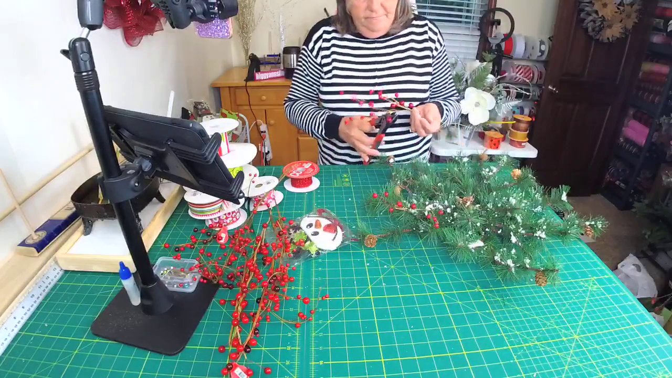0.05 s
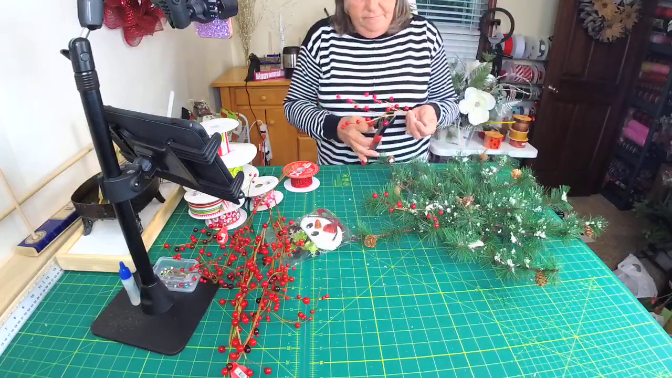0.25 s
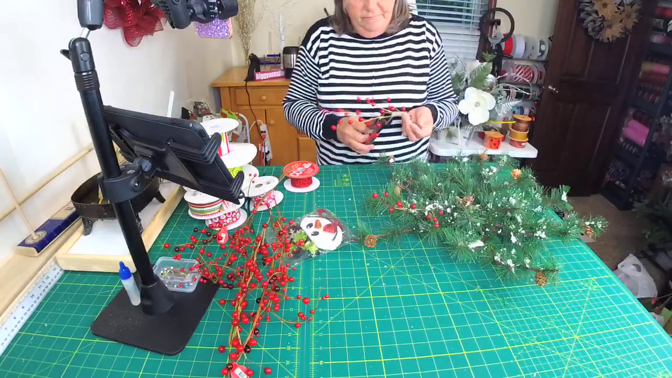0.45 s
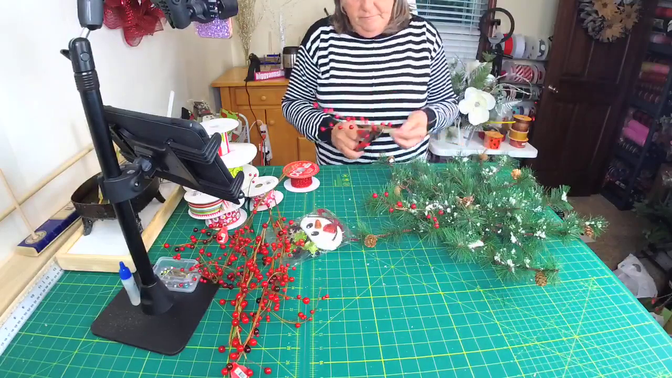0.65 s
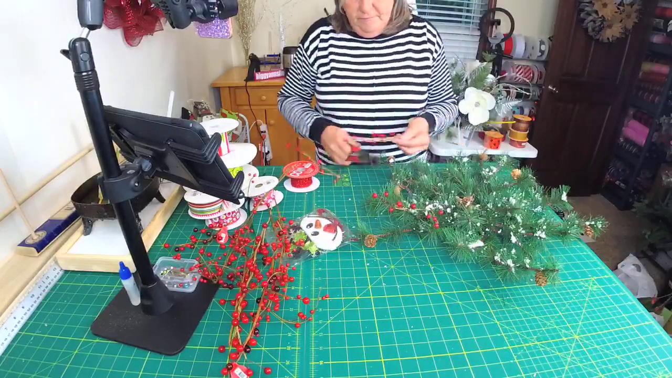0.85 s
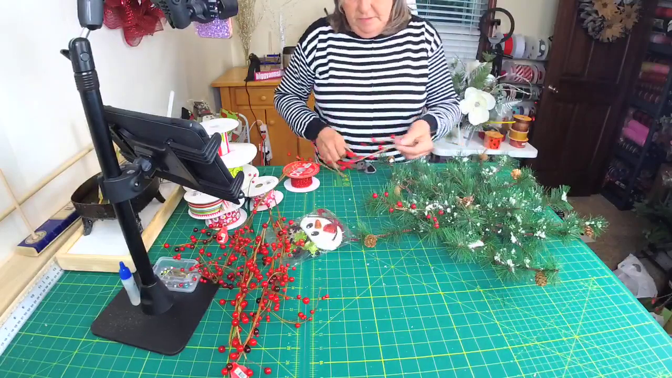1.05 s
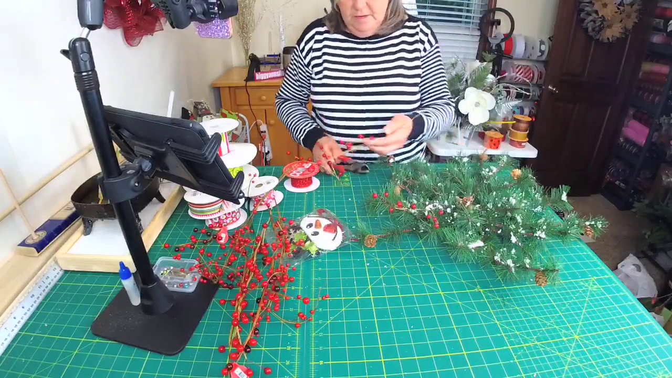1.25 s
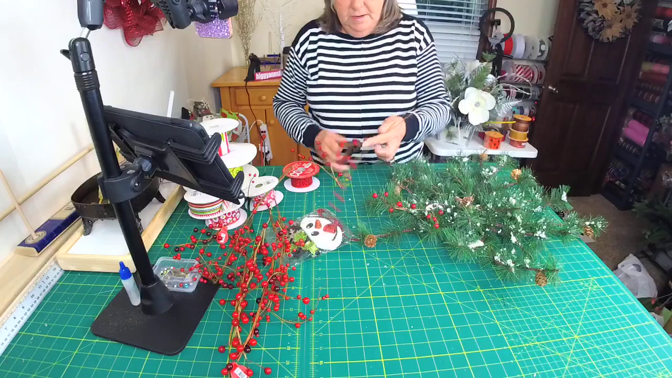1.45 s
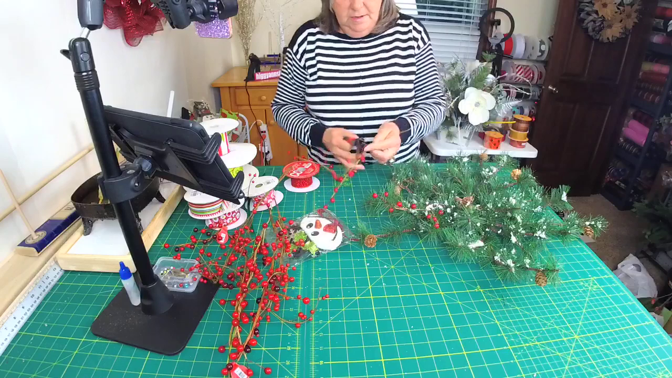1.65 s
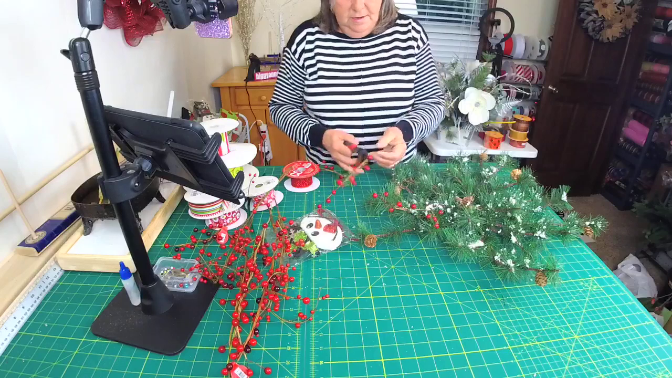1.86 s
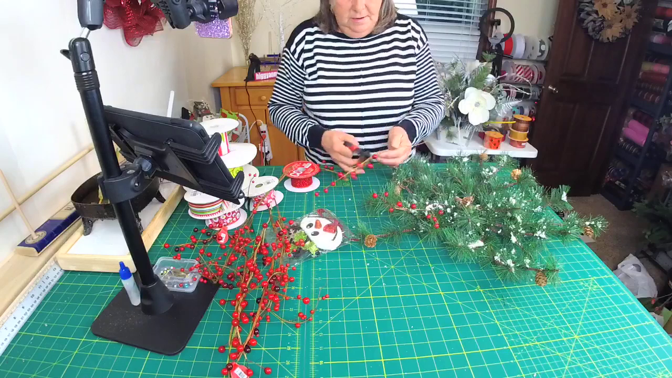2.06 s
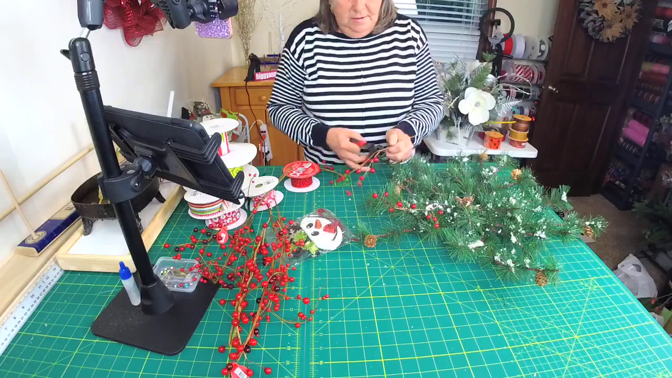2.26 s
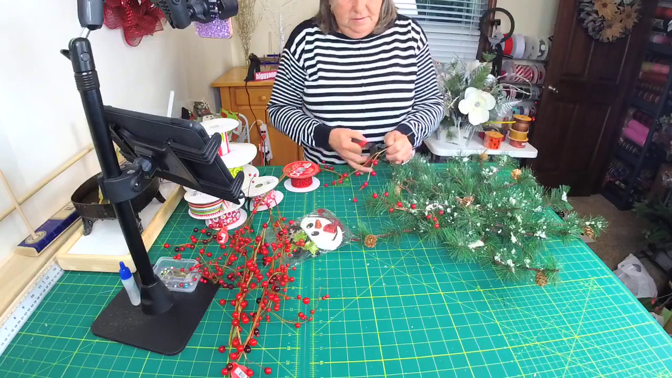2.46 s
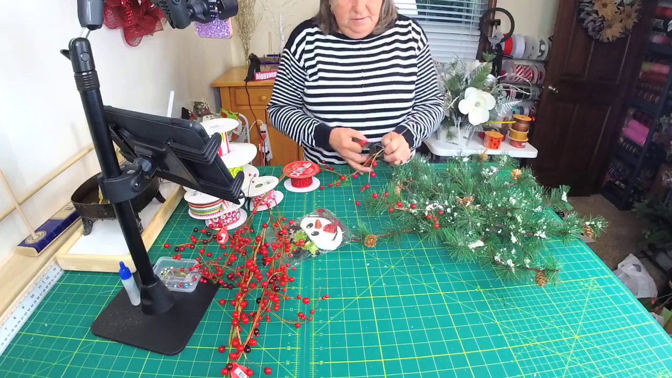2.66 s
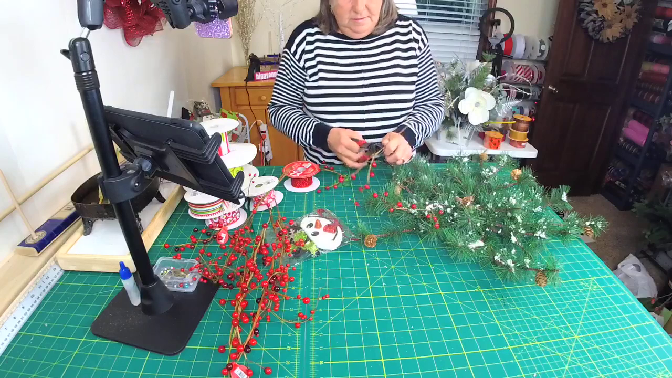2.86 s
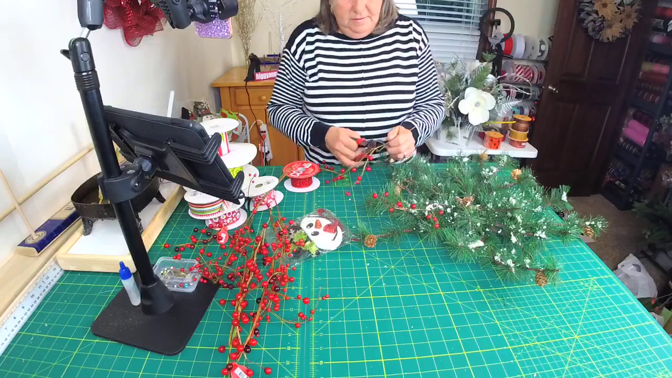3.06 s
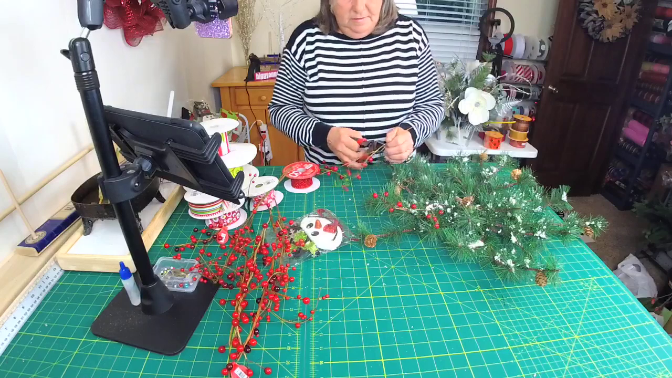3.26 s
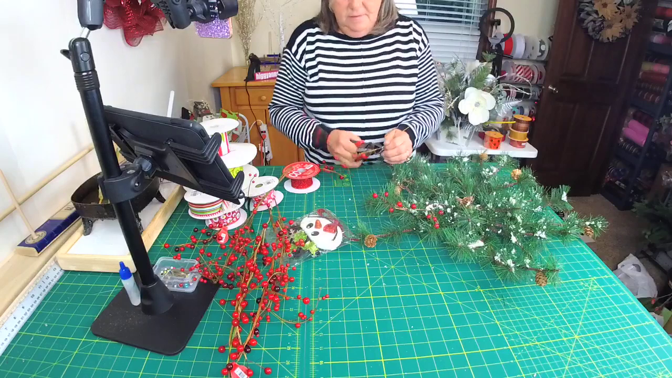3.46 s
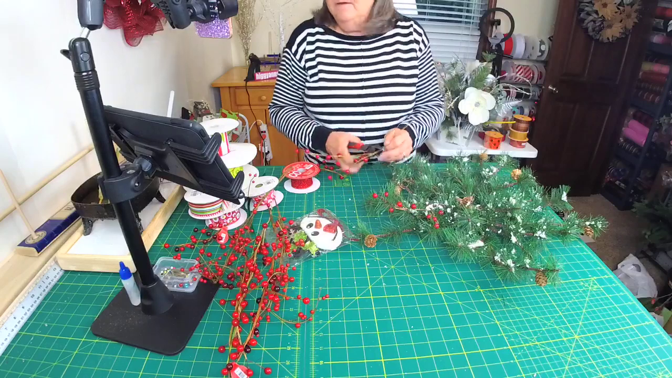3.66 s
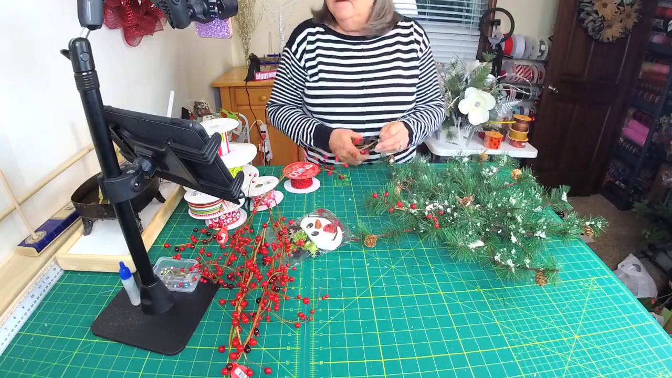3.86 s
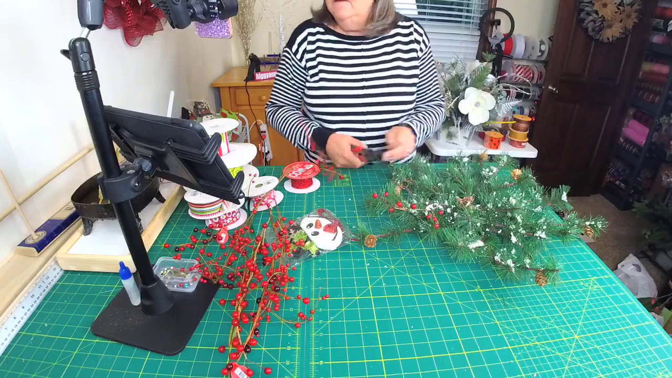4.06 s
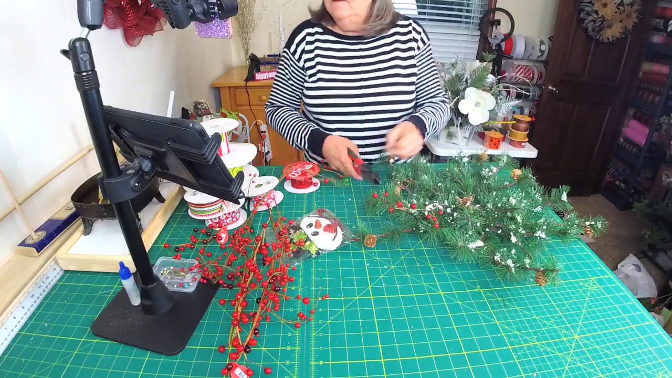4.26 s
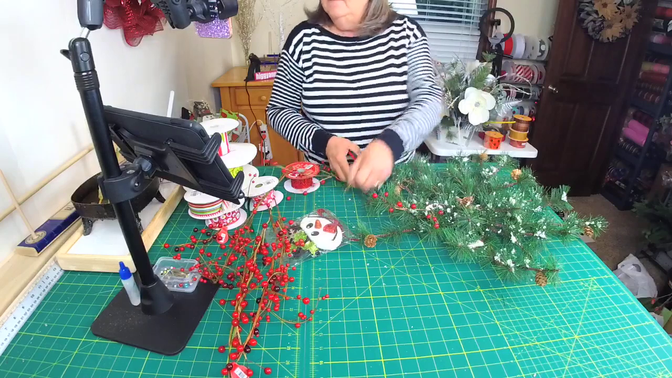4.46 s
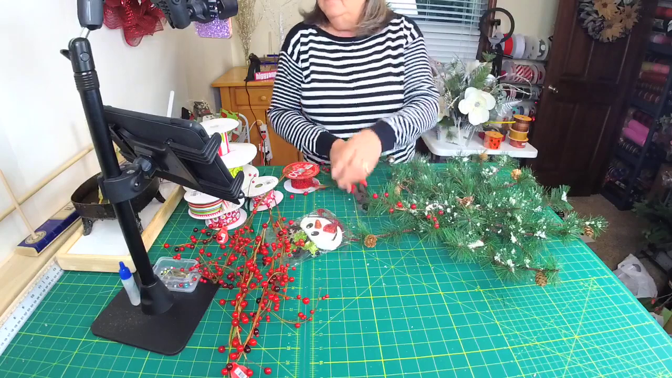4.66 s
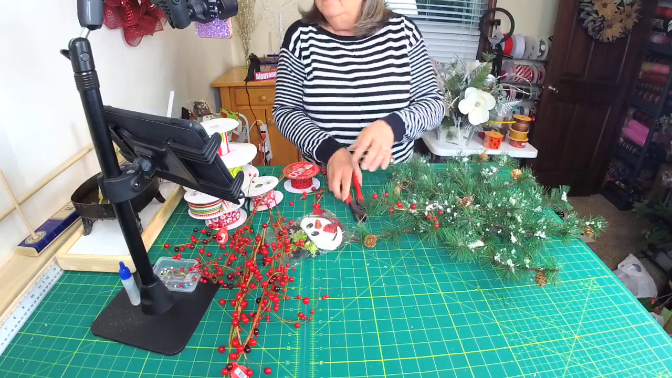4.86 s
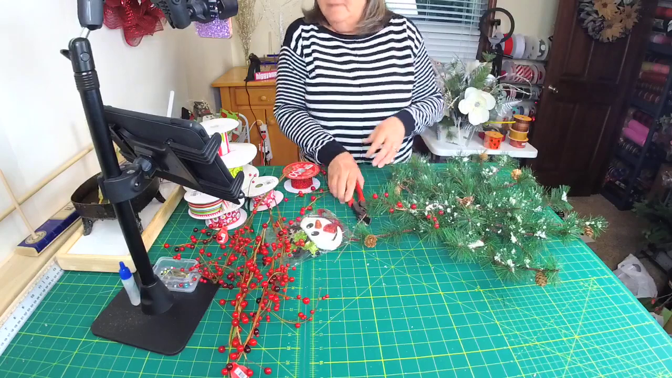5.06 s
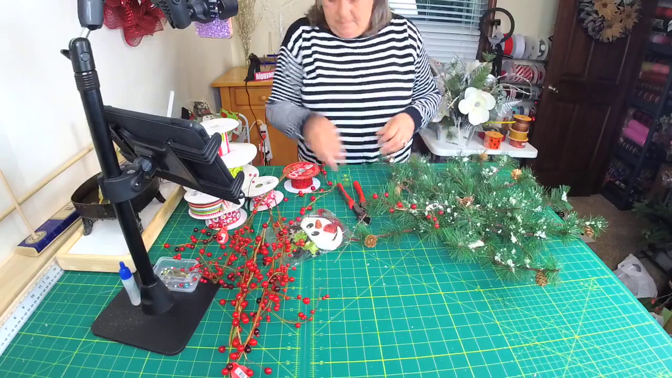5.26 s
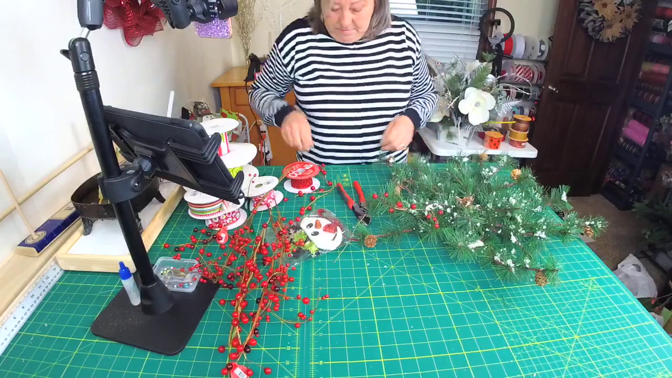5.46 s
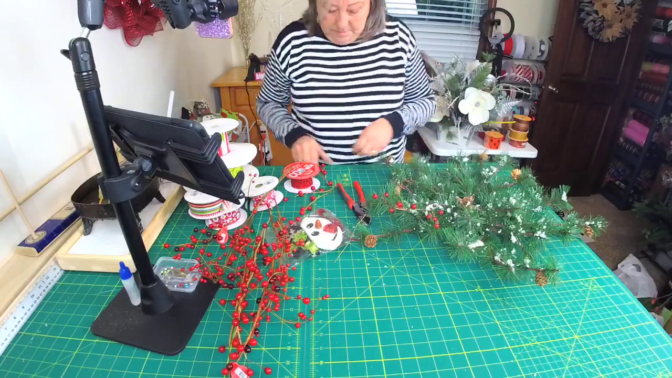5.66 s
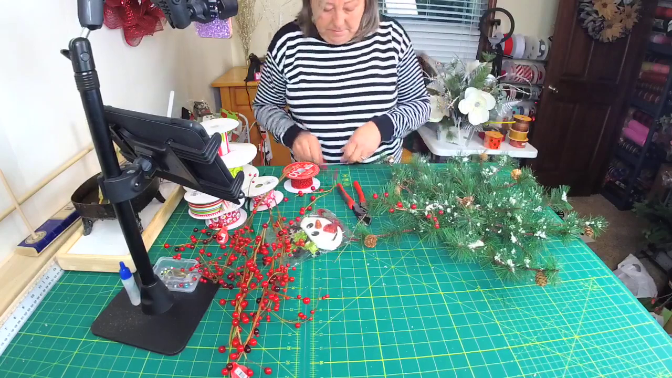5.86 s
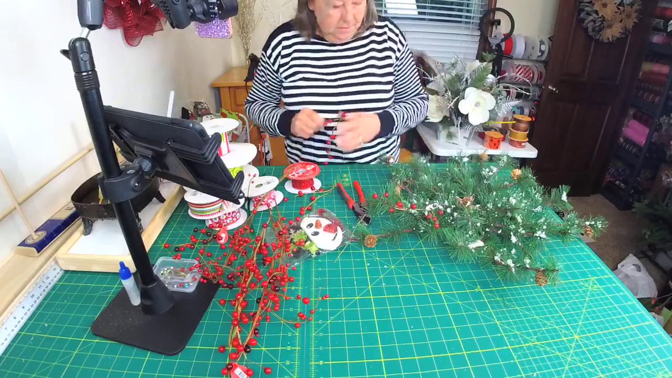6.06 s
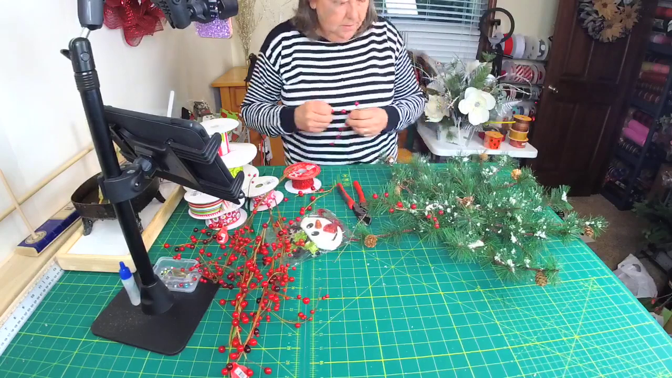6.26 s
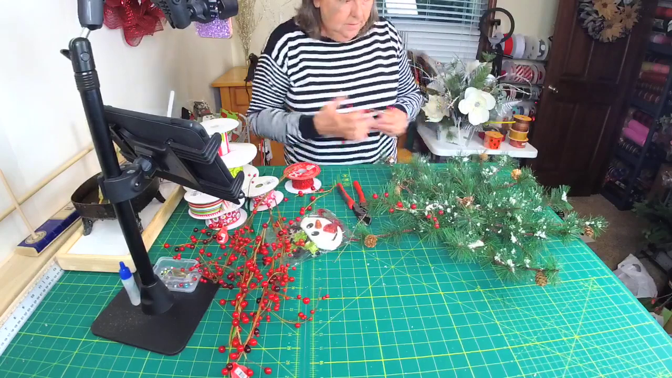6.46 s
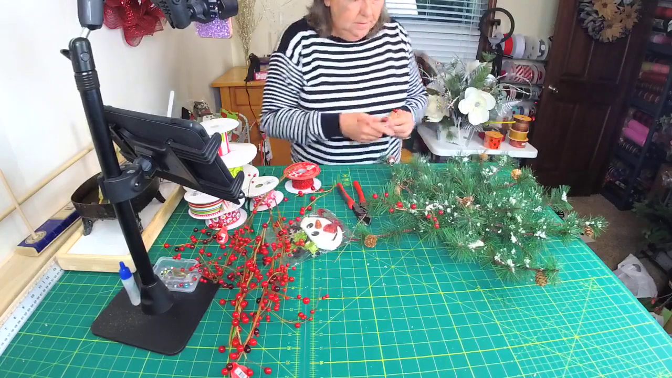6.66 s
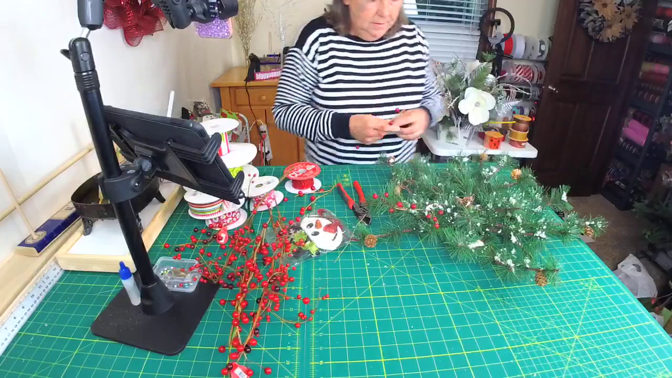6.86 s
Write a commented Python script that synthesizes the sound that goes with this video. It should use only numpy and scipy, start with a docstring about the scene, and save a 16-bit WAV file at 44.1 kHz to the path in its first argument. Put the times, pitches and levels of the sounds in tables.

```python
"""Wire cutters snip plastic berry stems above a craft table in a small furnished room: short bursts of noise
excite resonances. Stems and berries click the same way, and rustle as trains of tiny grains of noise.
Tools knock the table top (a push, a rebound and ringing modes) and wrists bump it (low fading tones).
Air handling rumbles, with mains hum and a thin flickering hiss (shaped noise and sines). A small microphone
pair hears it all through its housing, turns down during and just after loud sound, and clips."""
import sys
import numpy as np
from scipy import signal
from scipy.fft import rfft, irfft, next_fast_len
from scipy.io import wavfile
from scipy.ndimage import uniform_filter1d, map_coordinates

SR = 44100
rng = np.random.default_rng(int(sys.argv[2]) if len(sys.argv) > 2 else 0)


def inscribe(sig):
    """Save sig as 16-bit PCM at rate SR to the path in sys.argv[1].

    A 1-D sig is mono; a 2-D sig holds one channel per row.
    Samples are clipped to [-1, 1] before scaling.
    """
    pcm = np.round(np.clip(np.atleast_2d(sig).T, -1, 1) * 32767)
    wavfile.write(sys.argv[1], SR, pcm.astype(np.int16))


N = 305172  # length in samples

# room tone, rumble of the air handling: f/Hz, relative level per Hz/dB
RUMBLE_SPECTRUM = [(12, -42), (20, 2), (32, -17.5), (140, -12.5), (208, -21), (243, -20), (263, -17),
                   (360, -17.5), (447, -23), (484, -23), (625, -33.5), (873, -32.5), (2200, -46.5),
                   (2860, -107), (4840, -120)]
# room tone, thin hiss: f/Hz, relative level per Hz/dB
HISS_SPECTRUM = [(1500, -120), (2300, -12), (3500, -7.5), (5500, -13.5), (6300, 2.5), (8500, 1),
                 (11000, 2.5), (12800, -9), (13700, -4), (14100, -51), (16000, -64)]
# how alike left and right are in the noise: f/Hz, likeness (1 = same, 0 = unrelated)
LIKENESS = [(40, .93), (100, .98), (400, .97), (800, .86), (1600, .76), (3000, .3), (4200, .2), (6500, .45),
            (10000, .37), (15000, 0)]
# lean of the hiss to one side: f/Hz, left minus right/dB
HISS_LEAN = [(4000, 0.5), (6200, -2.5), (8700, 0), (10800, -5.5), (13000, 5.5)]
# mains hum: f/Hz, level/dB
HUM_TONES = [(59.8, -59), (240.3, -57), (479.8, -73.5)]

# how long the room rings: f/Hz, time to fall by 60 dB/s
ROOM_DECAY = [(500, 0.2), (1300, 0.15), (3500, 0.19), (9000, 0.15), (14000, 0.17)]
# first echoes from the walls: earliest t/s, level of the group/dB
FIRST_ECHO = (0.0063, 1.5)

# stems and berries tap each other and the mat: t/s, snap energy/dB,
# then relative to the snap: berry level/dB, stem level/dB, mat level/dB; berry f/Hz
TAPS = [(0.7554, -30.5, -8, -4.5, -40, 1670), (.8992, -17.5, 9, 2.5, -18, 1050),
        (0.9436, -13, 9.5, 5, -31, 1240), (.952, -31, 16.5, -5, -20, 1650),
        (1.062, -28.5, 13.5, 3.5, -15, 920), (1.125, -33, 0.5, 1, -22, 900),
        (1.5599, -7, -3, -4, -11.5, 880), (1.704, -17.5, -6.5, -5, -36, 930),
        (1.736, -34.5, 11.5, 11, -16, 920), (1.7713, -9, -7.5, -6.5, -27, 935),
        (1.778, -14.5, -4.5, -5, -28, 1100), (1.8854, -8.5, -8.5, -5, -12, 1180),
        (1.931, -27, -29, 0, -20, 1360), (2.1828, -8.5, -5.5, -5, -15, 980),
        (2.3358, -21, -4.5, -1, -34, 1050), (2.4572, -29.5, 0.5, 1, -22, 845),
        (2.607, -39, 2, 5.5, -15, 940), (2.8097, -34.5, 3, 5.5, -9, 915), (3.127, -37.5, 2, -1, -13, 980),
        (3.1981, -15, 5.5, 2.5, -38, 1150), (3.3075, -30, 7.5, 2.5, -17, 1240),
        (3.4716, -28, 0.5, -35, -18, 1230), (4.125, -17.5, 5, 1, -15, 1030),
        (4.1784, -30, -1, -9, -5, 1500), (4.192, -17, 6.5, 1, -35, 1130), (4.2108, -24.5, -3, 4.5, 2, 1120),
        (4.217, -37, 15, 0, -17, 1450), (4.2562, -32.5, 15.5, 12.5, -18, 1330),
        (4.2846, -34.5, 9, 5, -17, 1260), (4.3074, -36, 11, -8, -15, 1210),
        (4.434, -13.5, -1.5, -3, -29, 1370), (4.6268, -7, -5.5, -6, -21, 815),
        (4.6613, -11.5, -2.5, -3.5, -23, 875), (4.746, -22.5, 6, -3, -21, 900),
        (4.7613, -22.5, -3, -7, -1, 930), (4.9101, -41, 4, 13, -6, 1240),
        (4.799, -3.5, -4.5, -7, -6.5, 900), (5.0754, -21, -3.5, -5.5, -22, 930),
        (5.957, -20, 2, -2, -28, 1005), (5.9777, -18, 6, 0, -25, 1270), (5.994, -17, -9, -4, -37, 1320),
        (6.4526, -31, -6, -5, -22, 890), (6.4731, -26, -8.5, -12, -30, 860)]
# what a click sounds through, in the order snap, stem, wire: f/Hz, width of one pass/Hz
CLICK_BODIES = [(8810, 2470), (3410, 2250), (5460, 990)]
# the cutting mat under the hands: f/Hz, width of one pass/Hz
CUTTING_MAT = (480, 480)
TAP_MS, TAP_WIRE_DB = 1.7, -10.5  # time scale; wire against the snap when the berry is at 0 dB
WIRE_YIELDS = 0.4  # dB of wire lost for each dB of berry
TAP_PAN_DB, TAP_ROOM_DB = 5, -0.5  # lean to the left, scaled for each body; room level

# the cutter jaws part a wire: t/s, snap energy/dB, time scale/ms
JAW_SNIPS = [(0.7785, 9.5, 3.9), (3.9951, 14, 1.4)]
# colour of a snip, relative to the snap: berry level/dB, stem level/dB, wire level/dB, mat level/dB; berry f/Hz
SNIP_LEVELS = (-19.5, -13.5, -15, -28, 1446)
SNIP_PAN_DB, SNIP_ROOM_DB = 3, -2.5  # lean to the left, scaled for each body; room level

# stems dragged through fingers and needles: middle of the rise t/s, held t/s, level/dB, berry against it/dB
DRAGS = [(.95, .01, -54.5, 4), (1.14, 0.15, -64, -4), (1.57, .03, -64, 8), (1.741, 0.12, -61.5, 4.5),
         (3.199, 0.014, -49, -2), (3.29, 0.015, -68.5, 8), (3.47, 0.0072, -57.5, -17),
         (4.121, 0.038, -53.5, 4), (4.19, 0.09, -59, 9.5), (4.36, 0.13, -64.5, 2), (4.62, 0.031, -47.5, 0),
         (4.76, 0.21, -62, 1), (5.8, 0.1, -63, -5), (5.972, 0.0055, -48.5, 9), (6.04, 0.088, -71, -7),
         (6.24, 0.014, -57.5, -6.5), (6.44, 0.051, -73, -12)]
GRIP_S, FADE_DB_PER_S = 0.018, 236  # rise of a movement; its dying away
GRAINS_PER_S = 300  # average number of grains

# wrists and forearms leaning on the table: t/s, level/dB, base f/Hz, time to fall by 60 dB/s
WRIST_BUMPS = [(1.029, -43.5, 38.1, 0.91), (1.373, -32, 109.5, 0.086), (1.9, -30.5, 82.3, 0.14),
               (6.257, -32, 140, 0.11)]

# tools strike the table top: t/s, ring level/dB, contact rise/ms, direct push over the ring/dB,
# rebound delay/ms, rebound against the push/dB, crack over the ring before dulling/dB
TOOL_BLOWS = [(4.5231, -14.5, 0.5, 16.5, 1.72, 4.5, 10.5), (4.686, -26.5, 1.2, 2, 3.6, -5, 7),
              (4.9269, -15, 0.59, 7.5, 3.5, 2.5, 9), (5.196, -15.5, 0.985, -11, 2.52, 19, 7),
              (5.216, -15.5, 1.35, 6.5, 3.15, 7.5, 16.5)]
# ringing modes of the table top: f/Hz, middle level/dB, time to fall by 60 dB/s
TABLE_MODES = [(57.6, -13, 0.74), (99, -24, 0.35), (148.5, 1.5, 0.2), (180, -1, 0.11), (252.8, -5, 0.2),
               (298, -4, 0.14), (337.3, -3.5, 0.29), (407, 7, 0.19), (447, 0, 0.2), (602, 1.5, 0.18),
               (651, -1, 0.22), (796, -2, 0.25), (876, -2.5, 0.31), (920, -3, 0.06), (1030, -17, .12),
               (1020, -14, 0.2), (1290, -34, .12), (1550, -37.5, 0.16)]
# colour of a crack before dulling, relative to the snap:
# berry level/dB, stem level/dB, wire level/dB, mat level/dB; berry f/Hz
CRACK_LEVELS = (-2.5, -8.5, -13, 6.5, 958)
CRACK_MS, CRACK_DULLS = 1.3, 6.2  # time scale; dB of dulling per doubling of (1 + 2 * contact rise in ms)

# gaps in the response of the microphone housing: f/Hz, width/Hz, gain at the middle/dB
HOUSING_GAPS = [(2398, 580, -40), (4730, 1030, -23), (7140, 1760, -25.5), (11910, 1300, -41),
                (13860, 2300, -23), (16600, 5200, -23)]
# constant offset of the signal, one row each for left and right: offset (1 = full scale)
STEADY_OFFSET = [
    [.0153],
    [.0077],
]
TOP_HZ = 15700  # upper end of the band
DUCK_S, DUCK_LEVEL = 0.015, 1.42  # averaging time of loudness; loudness that halves the gain


def amp(db):
    """Turns decibels into gain."""
    return 10 ** (np.asarray(db) / 20)


def unit(x):
    """Scales x to an average (rms) level of 1."""
    return x / np.sqrt(np.mean(x ** 2) + 1e-20)


def along(points, hz):
    """Reads a curve of (Hz, value) points, spaced by pitch rather than by Hz."""
    f, v = np.transpose(points)
    return np.interp(np.log(hz + 1), np.log(f + 1), v)


def filtered(x, response):
    """Multiplies the spectrum of x by a response that depends on frequency."""
    m = next_fast_len(x.shape[-1] + 8192)  # spare room lets the filter ring out
    hz = np.fft.rfftfreq(m, 1 / SR)
    return irfft(rfft(x, m) * response(hz), m)[..., :x.shape[-1]]


def resonance(f, hz, width_hz):
    """Response of a body that rings at one pitch, with a gain of 1 there."""
    return 1j * f * width_hz / (hz * hz - f * f + 1j * f * width_hz)


def add(track, s, sound):
    """Mixes a sound into the track at time s."""
    part = track[..., round(s * SR):round(s * SR) + sound.shape[-1]]
    part += sound[..., :part.shape[-1]]


def room(x, wall_db=FIRST_ECHO[1]):
    """First echoes and a new random tail; how fast it dies depends on pitch, and its bass is alike on both sides."""
    hz, t, z = signal.stft(rng.standard_normal((2, SR // 3)), SR, nperseg=128)
    turn = np.arctan(hz / 4000)[:, None] * 0.64
    shared, own = np.cos(turn) * z[0], np.sin(turn) * z[1]
    z = np.array([shared + own, shared - own])
    fade = amp(-60 * t / along(ROOM_DECAY, hz)[:, None])
    tail = signal.istft(z * fade, SR, nperseg=128)[1]
    rise = 1 - np.exp(-np.arange(tail.shape[1]) / SR / 0.00017)
    tail = tail * rise / np.linalg.norm(tail[0])
    # four echoes, each reaching the two sides at slightly different times
    delays = FIRST_ECHO[0] * SR + 110 * rng.random(4) + 3 * rng.random((2, 4))
    echo = np.zeros_like(tail)
    echo[[[0], [1]], delays.astype(int)] = amp(wall_db) / 4
    return signal.fftconvolve(x, tail + echo, axes=1)


def coloured(burst, levels_db, bodies):
    """Sends a burst through each body twice, gives each result its own energy, and adds them."""
    bands = filtered(burst, lambda f: np.array([resonance(f, c, w) ** 2 for c, w in bodies])[:, None])
    bands = bands / np.linalg.norm(bands, axis=-1, keepdims=True)
    return np.sum(amp(levels_db) * bands, axis=0)


def rush(spectrum, patchy_db):
    """Stereo noise of average level 1, with random louder and softer patches in time and pitch."""
    z = signal.stft(rng.standard_normal((2, N)), nperseg=512)[2]
    field = uniform_filter1d(rng.standard_normal(z.shape[1:]), size=20, axis=0)
    field = uniform_filter1d(field, size=5, axis=1)
    pair = signal.istft(z * amp(patchy_db * unit(field)), nperseg=512)[1][:, :N]

    def shape(hz):
        turn = np.arccos(np.clip(along(LIKENESS, hz), -1, 1)) / 2
        return amp(along(spectrum, hz)) * [np.cos(turn), np.sin(turn)]

    mid, side = filtered(pair, shape)
    return unit(np.array([mid + side, mid - side]))


def room_tone():
    """Low rumble of air handling, mains hum of wavering phase and a thin hiss that flickers quickly."""
    t = np.arange(N) / SR
    hum = sum(amp(db) * np.sin(2 * np.pi * hz * t + np.cumsum(rng.normal(0, .012, N)))
              for hz, db in HUM_TONES)
    # a new random level every 220 samples (5 ms), joined smoothly
    flicker = map_coordinates(rng.standard_normal(N // 200 + 4), [np.arange(N) / 220])
    hiss = rush(HISS_SPECTRUM, patchy_db=.6)
    hiss = filtered(hiss, lambda hz: amp(along(HISS_LEAN, hz) * [[.5], [-.5]]))
    hiss = hiss * amp(2.85 * flicker)
    rumble = rush(RUMBLE_SPECTRUM, patchy_db=.3)
    return amp(-50) * rumble + amp(-60.5) * hiss + hum


def click(s, db, ms, colour, pan_db, room_db):
    """One sharp fracture amid smaller ones, over in milliseconds, ringing the bodies; mainly the snap leans."""
    berry_db, stem_db, wire_db, mat_db, berry_hz = colour
    u = np.arange(SR // 30) / SR * 1000 / ms
    shared, own = u * np.exp(-3 * u) * rng.standard_normal((2, len(u)))
    # the sharp fracture falls where the smaller ones are strongest
    shared[round(ms / 3000 * SR)] += 1.9 * np.linalg.norm(shared)
    burst = shared + .5 * own * [[1], [-1]]
    # snap, stem, wire, berry, mat
    levels_db = np.array([0, stem_db, wire_db, berry_db, mat_db])[:, None]
    levels_db = levels_db + np.outer([0.43, 0.096, 0.04, 0.071, 0.069], [pan_db, -pan_db])
    width_hz = np.interp(berry_db, [-4, 7], [1500, 300])  # a squarely struck berry rings, a grazed one only ticks
    bodies = CLICK_BODIES + [(berry_hz, width_hz), CUTTING_MAT]
    dry = amp(db) * coloured(burst, levels_db[..., None], bodies)
    sound = amp(room_db) * room(np.pad(dry, [(0, 0), (18, 0)]))  # the room starts 18 samples late
    # the hands hide part of the berries' knock, which arrives mostly by the walls
    add(sound, 0, filtered(dry, lambda f: 1 - .5 * resonance(f, berry_hz, 990)))
    return s - .0004, sound


def taps():
    """Stems and berries tap each other and the mat; the more berry, the less wire."""
    out = np.zeros((2, N))
    for s, db, berry_db, stem_db, mat_db, berry_hz in TAPS:
        wire_db = TAP_WIRE_DB - WIRE_YIELDS * berry_db
        colour = berry_db, stem_db, wire_db, mat_db, berry_hz
        add(out, *click(s, db, TAP_MS, colour, TAP_PAN_DB, TAP_ROOM_DB))
    return out


def snips():
    """The cutter jaws part a wire: a loud click, mostly snap."""
    out = np.zeros((2, N))
    for s, db, ms in JAW_SNIPS:
        add(out, *click(s, db, ms, SNIP_LEVELS, SNIP_PAN_DB, SNIP_ROOM_DB))
    return out


def rustle():
    """Dense uneven grains while stems slide: each movement rises, holds and dies away."""
    out = np.zeros((2, N))
    for s, held, db, berry_db in DRAGS:
        t = np.arange(0, held + .25, 1 / SR)
        sizes = rng.standard_normal(len(t)) * amp(2 * rng.exponential(size=len(t)))
        grains = sizes * (rng.random(len(t)) < GRAINS_PER_S / SR)
        rise = np.clip(t / GRIP_S, 0, 1)
        fade = amp(db - FADE_DB_PER_S * np.maximum(t - GRIP_S - held, 0))
        # snap, stem, wire, berry
        levels_db = [[[0]], [[berry_db / 2 - 7]], [[-12]], [[berry_db]]]
        slide = coloured(grains[None], levels_db, CLICK_BODIES + [(1250, 1570)])
        dry = rise * fade * np.sqrt(len(t)) * slide  # the root turns energy 1 into average level 1
        add(out, s - GRIP_S / 2, 0.57 * dry)
        add(out, s - GRIP_S / 2, room(dry))
    return out


def bumps():
    """Soft flesh gives a low, uneven thump of four fading tones, without a crack."""
    out, t = np.zeros(N), np.arange(SR // 2) / SR
    partials = [(1.057, 6), (0.697, 7.0), (1.55, 3.5), (2.4, -5.5)]  # f over base f, level/dB
    for s, db, hz, t60 in WRIST_BUMPS:
        thump = sum(amp(level) * np.sin(2 * np.pi * hz * ratio * t) for ratio, level in partials)
        rise = 1 - np.exp(-t / 0.014)
        add(out, s, amp(db - 60 * t / t60) * rise * thump)
    return out


def knocks():
    """A contact pushes the table top down, it springs back, rings unevenly and fills the room; longer is duller."""
    out, t = np.zeros((2, N)), np.arange(SR // 2) / SR
    for s, db, ms, push_db, rebound_ms, rebound_db, _ in TOOL_BLOWS:
        ring = np.zeros(len(t))
        for k, (hz, level, t60) in enumerate(TABLE_MODES):
            fade = amp(level + rng.normal(0, 2.2) - 60 * t / t60)
            wander = np.cumsum(rng.normal(0, 0.052, len(t)))
            ring += fade * np.sin(2 * np.pi * hz * t + k * np.pi + wander)
        ring *= 1 - np.exp(-t / 0.0013)
        u = t[:SR // 30] * 1000 / ms
        contact = u * u * np.exp(-2 * u)  # strongest at u = 1
        push = np.zeros(SR // 50)
        push[[0, round(rebound_ms * SR / 1000)]] = -1, amp(rebound_db)  # down, then back up
        direct = amp(db + push_db) * signal.fftconvolve(push, contact / contact.max())[None]
        add(out, s, direct)
        add(out, s, amp(-7.5) * room(direct, wall_db=-7))
        add(out, s, amp(db) * signal.fftconvolve(ring, contact / contact.sum()))
    return filtered(out, lambda f: (1j * f / (60 + 1j * f)) ** 2)  # a free plate radiates little deep bass


def cracks():
    """The crack early in each blow on the table; a long soft contact loses most from the bright snap."""
    out = np.zeros((2, N))
    berry_db, stem_db, wire_db, mat_db, berry_hz = CRACK_LEVELS
    for s, db, ms, *_, crack_db in TOOL_BLOWS:
        dull_db = CRACK_DULLS * np.log2(1 + 2 * ms)
        # the snap loses twice the dulling, the other bodies once
        snap_db = db + crack_db - 2 * dull_db
        colour = berry_db + dull_db, stem_db + dull_db, wire_db + dull_db, mat_db + dull_db, berry_hz
        add(out, *click(s + 2 * ms / 1000, snap_db, CRACK_MS, colour, TAP_PAN_DB, TAP_ROOM_DB))
    return out


def scene():
    """Everything at the microphone ports."""
    return room_tone() + taps() + snips() + rustle() + bumps() + knocks() + cracks()


def record(dry):
    """Housing colour, gain that falls during and just after loud sound, an offset, clipping and the band limit."""
    x = filtered(dry, lambda f: np.prod(
        [1 - (1 - amp(db)) * resonance(f, c, w) for c, w, db in HOUSING_GAPS], axis=0))
    keep = np.exp(-1 / (SR * DUCK_S))
    loud = np.sqrt(signal.lfilter([1 - keep], [1, -keep], np.mean(x ** 2, axis=0)))
    x = x / (1 + loud / DUCK_LEVEL) + STEADY_OFFSET
    return filtered(np.clip(x, -1, 1), lambda hz: hz < TOP_HZ)


dry = scene()
out = record(dry)
inscribe(out)
```